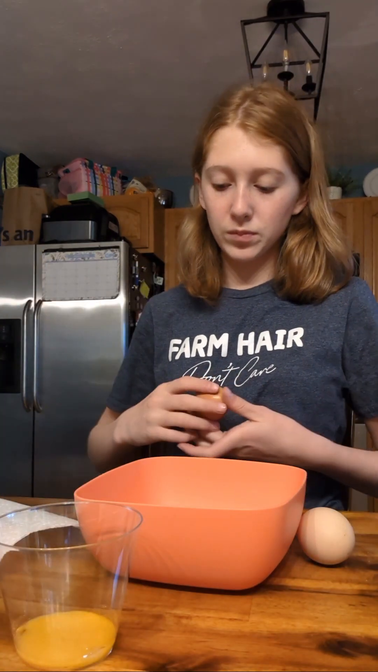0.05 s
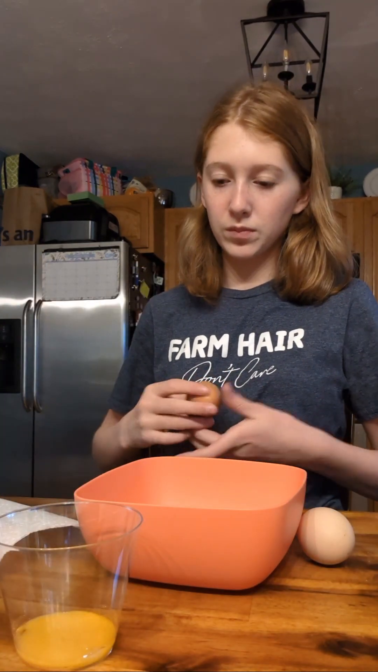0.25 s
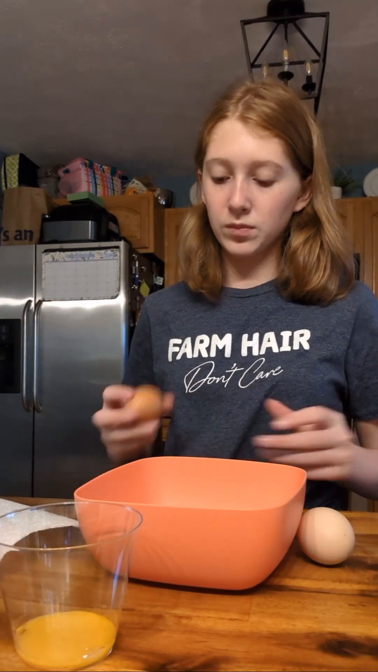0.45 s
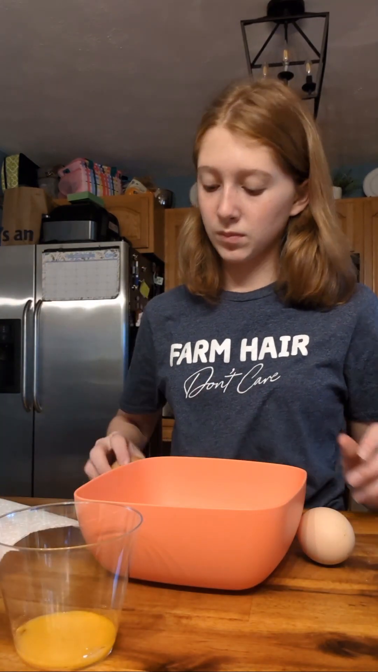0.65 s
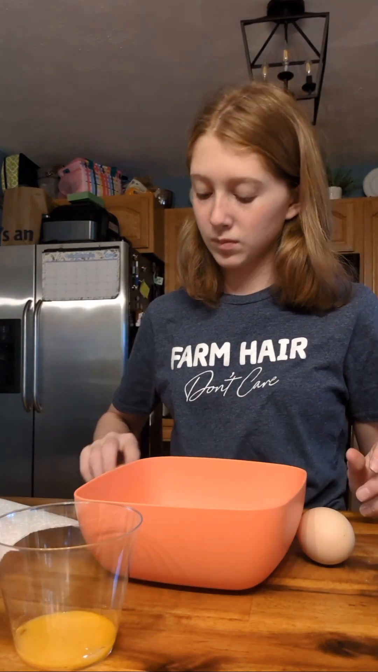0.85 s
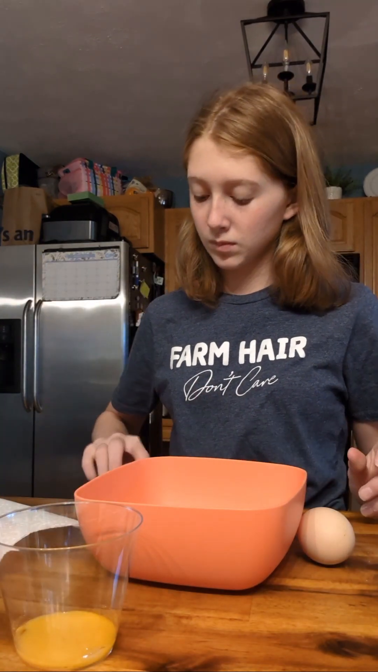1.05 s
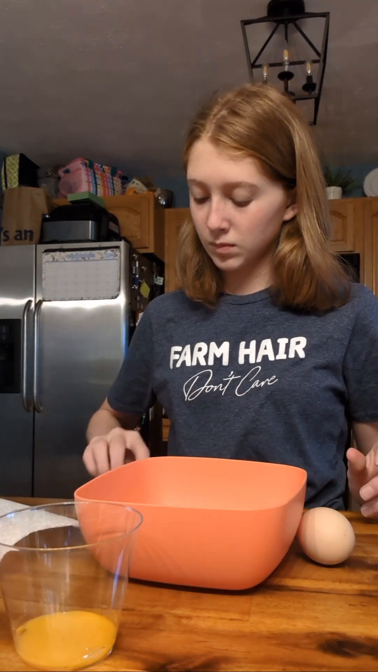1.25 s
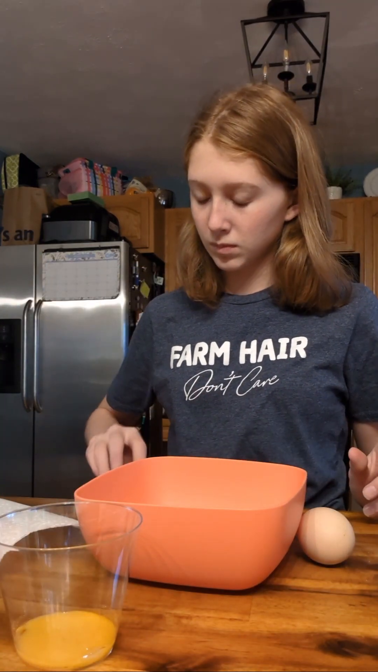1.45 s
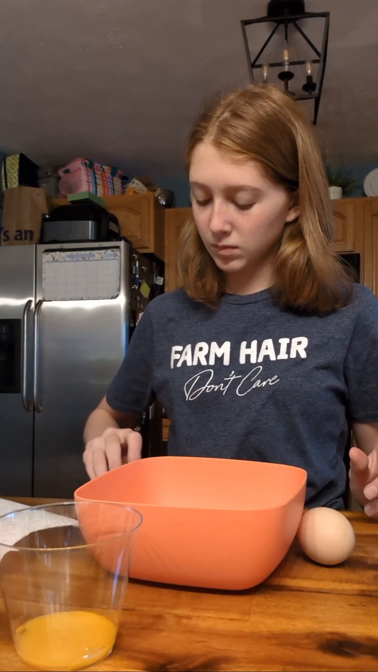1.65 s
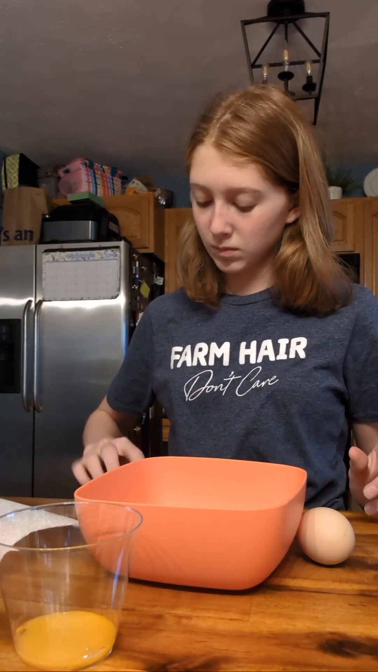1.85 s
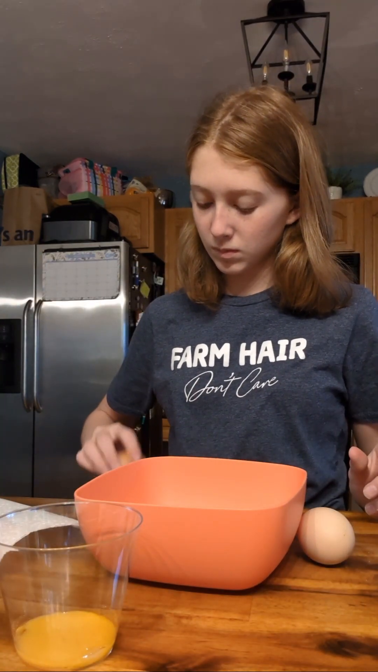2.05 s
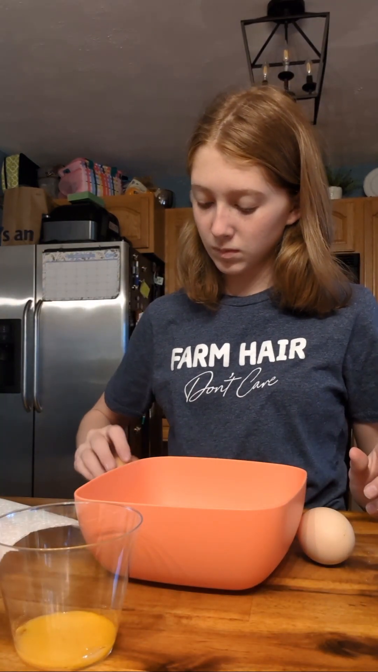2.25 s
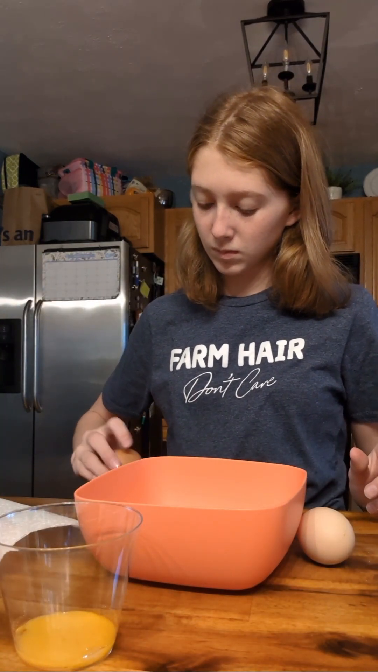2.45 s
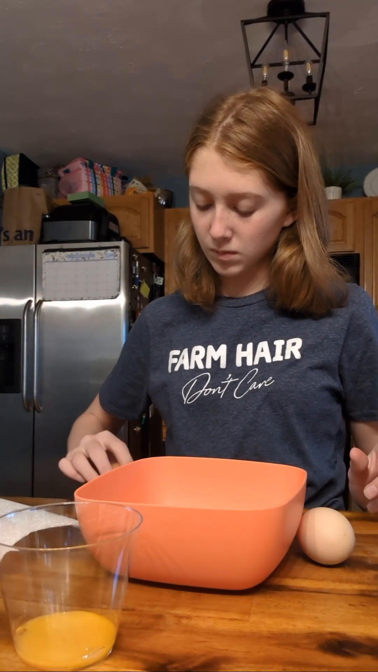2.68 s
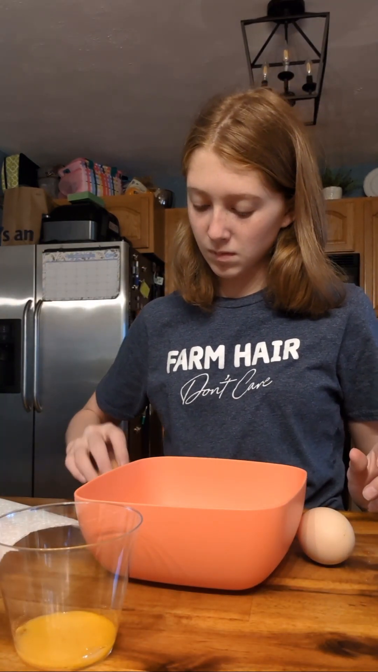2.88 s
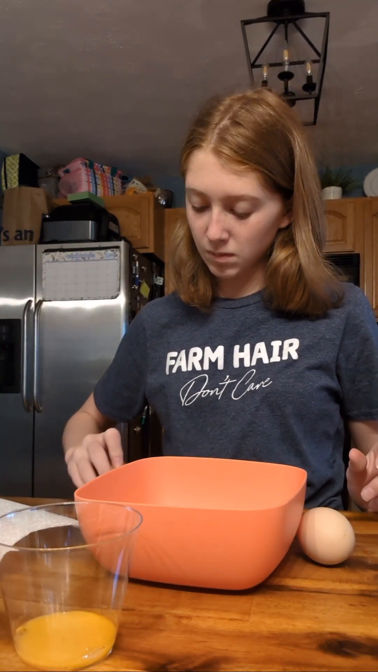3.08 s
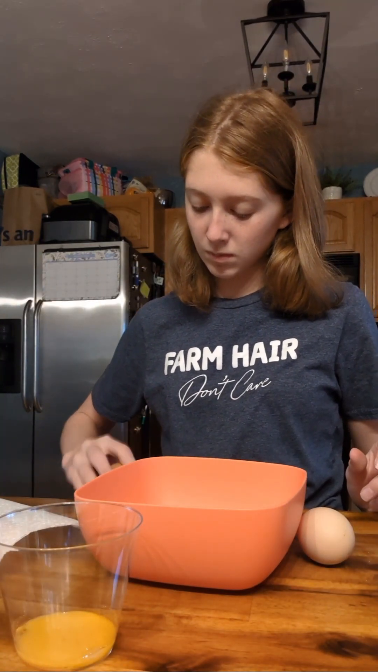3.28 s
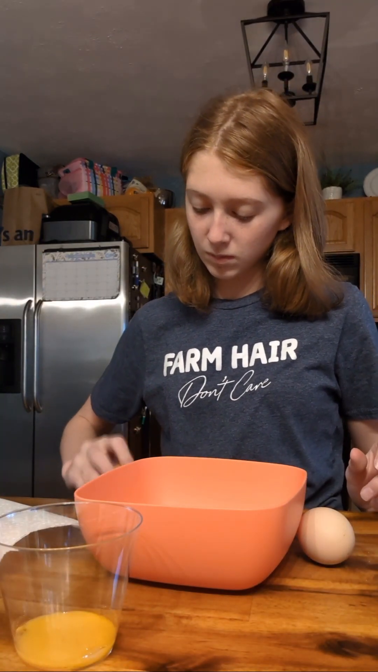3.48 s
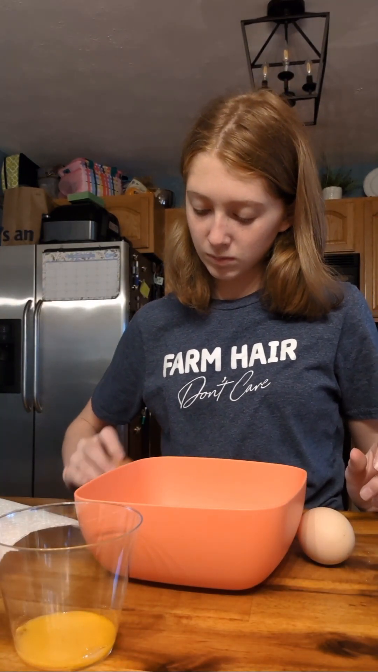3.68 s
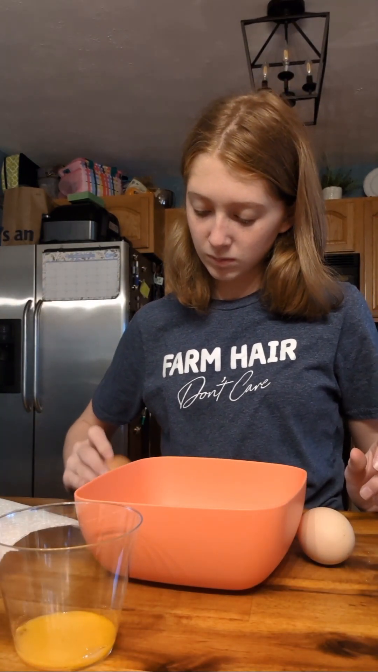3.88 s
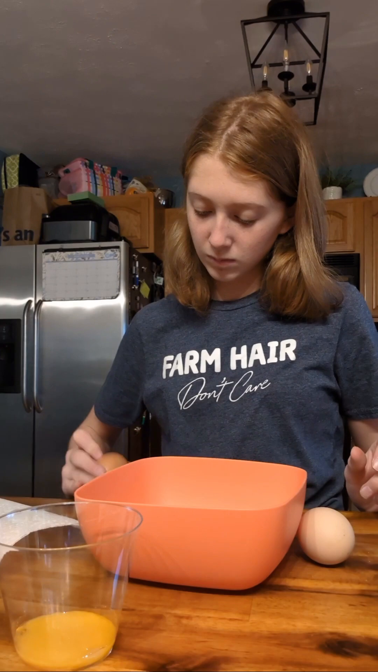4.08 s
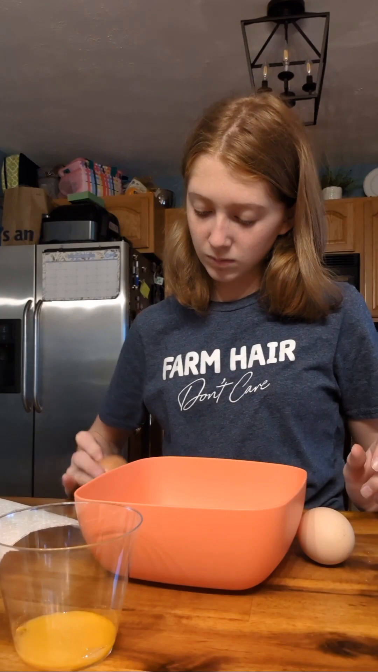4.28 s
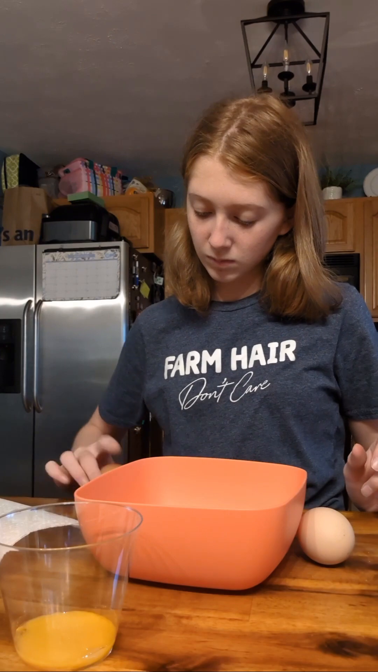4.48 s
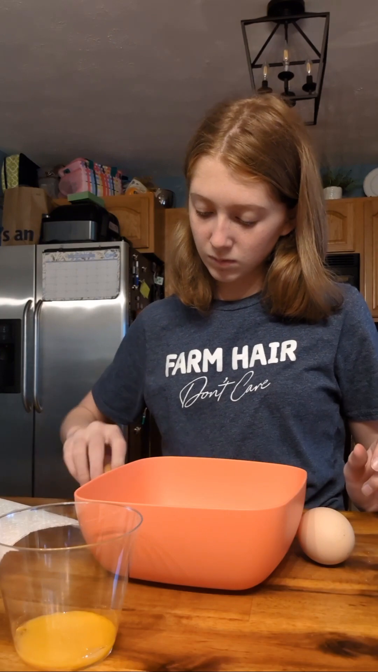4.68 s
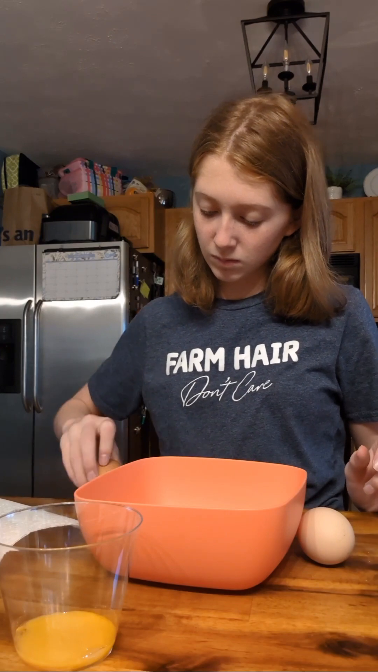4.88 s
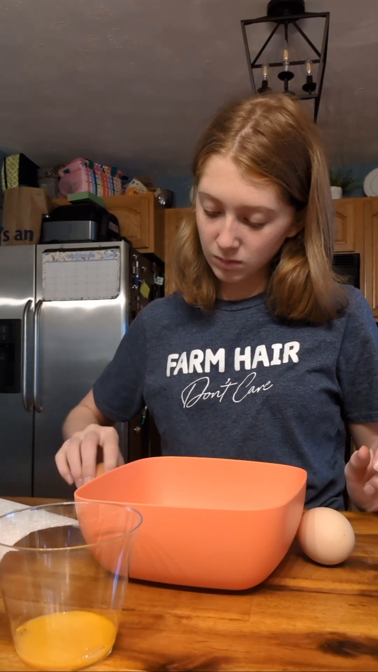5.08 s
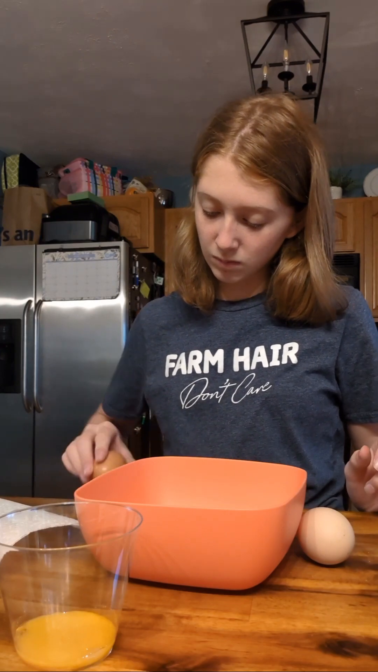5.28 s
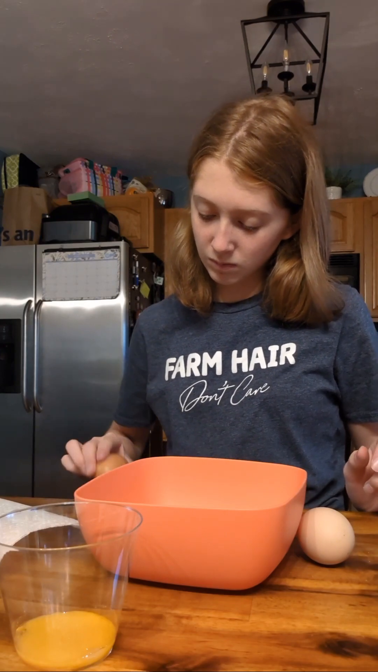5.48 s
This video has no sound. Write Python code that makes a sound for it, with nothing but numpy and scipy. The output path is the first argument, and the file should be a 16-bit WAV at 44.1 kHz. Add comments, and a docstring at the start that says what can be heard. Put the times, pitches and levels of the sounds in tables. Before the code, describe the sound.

A quiet kitchen: a low, slightly wavering fridge hum and soft, dull room air, a little hissier at the very start. At about 0.6 s a very faint squeak slides downward. From 0.85 s an egg is knocked on the rim of a plastic bowl, roughly every 0.2 s. The first five knocks, to 1.7 s, are hollow, with a woody thud from the table and a short room tail. From 1.9 s they are drier and lighter; the one at 2.77 s is very weak. After a short gap, knocks from 3.12 to 4.38 s are crisper, with brighter shell clicks. Then a pause: light touches and a brief faint rub around 4.6 s, small soft bumps, and a dull low bump with touches at 5.03 s. One last crisp knock lands at 5.43 s, its tail cut short. Close stereo pickup, taps leaning left, loud peaks squeezed.

```python
"""Egg knocked on a bowl rim

An egg is knocked again and again on the rim of a plastic bowl on a wooden kitchen table, left of a phone.
Each knock is shell noise plus dying sines: short ones for the bowl, longer for the table top; a noise tail
is the kitchen's answer. Hum lines (a fridge) and shaped noise (room air) lie behind; a faint squeak, light
touches, dull bumps and a short rub join in. The phone's limiter squeezes every knock."""
import sys
import numpy as np
from scipy import signal
from scipy.fft import rfft, irfft
from scipy.io import wavfile
from scipy.ndimage import uniform_filter1d

SR = 44100
rng = np.random.default_rng(int(sys.argv[2]) if len(sys.argv) > 2 else 0)


def attenuation_scalar(level_db):
    """Turn a level in dB into a linear amplitude multiplier (20 dB per decade)."""
    decades = np.asarray(level_db, float) / 20
    return 10 ** decades


def waveform_to_disk(signal):
    """Save audio, clipped to [-1, 1], as 16-bit WAV at the path in sys.argv[1]."""
    frames = np.transpose(np.atleast_2d(signal))
    scaled = np.clip(frames, -1, 1) * 32767
    samples = np.round(scaled).astype(np.int16)
    wavfile.write(sys.argv[1], SR, samples)


N = 243873

# Right port against left, direct sound. Each row: frequency in Hz, gain in dB.
PORT_SHADOW = [(150, -18.5), (600, -31), (1500, -40.5), (4000, -8.5), (8000, -24.5), (12000, 1)]
# Faint falling squeak. Each row: time in seconds, frequency in Hz, level in dB before fuzz and panning.
SQUEAK_PATH = [(.575, 4260, -71), (0.602, 4080, -62), (0.631, 3280, -65), (0.662, 2930, -68),
               (0.682, 2780, -72)]


def evened(x):
    """Scales to rms 1."""
    return x / np.sqrt(np.mean(x ** 2) + 1e-20)


def read(points, hz):
    """Reads a spectrum on a log-frequency axis."""
    f, value = np.transpose(points)
    return np.interp(np.log(hz + 1), np.log(f + 1), value)


def add(mix, start_s, sound):
    """Mixes a stereo sound in at start_s."""
    part = mix[:, round(start_s * SR):][:, :sound.shape[1]]
    part += sound[:, :part.shape[1]]


def air():
    """Room noise: random short-time spectra with soft patches, nearly mono in the bass."""
    # Noise spectrum. Each row: frequency in Hz, relative density in dB per Hz.
    air_tone = [(25, -34), (45, -12), (80, 0), (200, -2), (310, -12), (630, -17), (1000, -26), (2000, -31),
                (4000, -36), (6300, -40), (8000, -47), (13000, -51), (16000, -57)]
    # Swell of the middle band. Each row: time in seconds, boost in dB.
    swell_points = [(0, 11), (0.118, 10), (0.301, 1), (.45, 2), (4.501, 3), (4.8, 8), (5.1, 4.5),
                    (5.347, -1), (5.53, 7.5)]
    # Stereo likeness. Each row: frequency in Hz, left-right correlation.
    air_same = [(60, 0.93), (290, 0.97), (640, 0.14), (1400, 0.26), (3100, -0.32)]
    # Stereo balance. Each row: frequency in Hz, left over right in dB.
    air_lean = [(60, 0.54), (240, 0.49), (950, 4.7), (3770, 4.4), (15000, 1)]
    level_db, patches_db = -46, 1.8  # both rms
    frames, hz = N // 512 + 5, np.fft.rfftfreq(2048, 1 / SR)
    a, b, c, d, patches = rng.standard_normal((frames, 1025, 5)).T
    patches = evened(uniform_filter1d(uniform_filter1d(patches, 20, 0), 6, 1))
    same = np.clip(read(air_same, hz), -1, 1)[:, None]
    left = a + 1j * b
    right = same * left + np.sqrt(1 - same ** 2) * (c + 1j * d)
    z = np.array([left, right * attenuation_scalar(-read(air_lean, hz))[:, None]])
    # swell: full from 600 Hz to 7 kHz, none below 300 Hz or above 10.5 kHz
    band = np.clip(np.minimum(hz / 300 - 1, 3 - hz / 3500), 0, 1)[:, None]
    swell_db = np.interp(np.arange(frames) * 512 / SR, *np.transpose(swell_points)) * band
    z *= attenuation_scalar(read(air_tone, hz)[:, None] + patches_db * patches + swell_db)
    noise = signal.istft(z, nperseg=2048, noverlap=1536)[1][:, :N]
    return attenuation_scalar(level_db) * evened(noise)


def fridge():
    """Compressor hum: steady-pitched sines whose common level wavers, slightly to the left."""
    # Each row: frequency in Hz, rms in dB before wavering and panning.
    hum_lines = [(59.2, -38), (118.4, -52), (177.6, -55), (199.2, -58), (527.6, -69), (586.8, -69),
                 (764.4, -66)]
    # Each row: time in seconds, gain in dB.
    hum_waver = [(0, 0), (1.4, -.5), (1.7, -4), (2.7, -8), (3.1, -4), (4.0, -1), (4.75, -6), (5.0, -1),
                 (5.53, 0)]
    t = np.arange(N) / SR
    hum = sum(attenuation_scalar(db) * np.sqrt(2) * np.sin(2 * np.pi * (hz * t + rng.random())) for hz, db in hum_lines)
    return hum * attenuation_scalar(np.interp(t, *np.transpose(hum_waver))) * attenuation_scalar(np.array([[.4], [-.4]]))


def squeak():
    """Gliding sine, its amplitude roughened by smoothed noise."""
    s, hz, db = np.transpose(SQUEAK_PATH)
    t = np.arange(s[0], s[-1], 1 / SR)
    fuzz = 1 + .6 * evened(uniform_filter1d(rng.standard_normal(len(t)), 150))
    tone = np.sin(2 * np.pi * np.cumsum(np.interp(t, s, hz)) / SR)
    return attenuation_scalar(np.interp(t, s, db)) * fuzz * tone * attenuation_scalar(np.array([[3], [-6]]))


def crack(t60_s=0.01, rise_s=0.0016):
    """A few milliseconds of noise as the shell meets the rim."""
    # Shell noise. Each row: frequency in Hz, relative level in dB.
    shell_tone = [(1500, 3.5), (2500, 8), (3500, -1), (5500, -4), (7500, -10.5), (9000, -19.5),
                  (15000, -36.5)]
    t, hz = np.arange(1024) / SR, np.fft.rfftfreq(1024, 1 / SR)
    noise = rfft(rng.standard_normal(1024)) * attenuation_scalar(read(shell_tone, hz))
    both = irfft(noise * attenuation_scalar(np.array([0 * hz, read(PORT_SHADOW, hz)])))
    envelope = attenuation_scalar(-60 * t / t60_s) * (1 - np.exp(-(t / rise_s) ** 2))
    return both / np.std(both[0]) * envelope


def ring(modes, colour, chance, length_s, detune, scatter_db, rise_s):
    """Dying sines, each a little different from blow to blow; rows are modes."""
    hz, db, t60_s = np.transpose(modes)[..., None]
    t = np.arange(round(length_s * SR)) / SR
    level_db = db + read(colour, hz) + scatter_db * chance[:, :1] - 60 * t / t60_s
    phase = 2 * np.pi * hz * (1 + detune * chance[:, 1:2]) * t + chance[:, 2:]
    return attenuation_scalar(level_db) * (1 - np.exp(-t / rise_s)) * np.sin(phase)


def kitchen(colour):
    """Dense noise tail, every band dying at its own speed, drawn afresh for each blow."""
    # Decay. Each row: frequency in Hz, t60 in seconds.
    room_t60 = [(100, 0.66), (260, 0.33), (700, 0.39), (1840, 0.45), (4850, 0.4), (12800, 0.22)]
    # What the knocks send into the room. Each row: frequency in Hz, relative level in dB.
    room_tone = [(60, -16), (120, 13.5), (300, 28), (600, 27), (1100, 7), (2000, -6), (2800, -9),
                 (3500, -14.5), (4500, -12), (7000, -15.5), (9000, -21.5), (15000, -34)]
    # Stereo likeness. Each row: frequency in Hz, left-right correlation.
    tail_same = [(100, 0.87), (300, 1), (700, 0.18), (2000, 0.027)]
    # Stereo balance. Each row: frequency in Hz, left over right in dB.
    tail_lean = [(150, 0.5), (500, 5), (2000, 2), (5000, 7), (9000, 4.5), (13000, -5.5)]
    build_s, ripple_db = .012, 2.2  # reflections take time to fill the room, unevenly over frequency
    taps = rng.standard_normal((2, SR // 2))
    hz, t, z = signal.stft(taps, SR, nperseg=512)
    same = np.clip(read(tail_same, hz), 0, 1)[:, None]
    right = same * z[0] + np.sqrt(1 - same ** 2) * z[1]
    z[1] = right * attenuation_scalar(-read(tail_lean, hz))[:, None]
    uneven_db = ripple_db * evened(uniform_filter1d(rng.standard_normal(len(hz)), size=2))
    start_db = read(room_tone, hz) + read(colour, hz) + uneven_db
    level_db = start_db[:, None] - 60 * t / read(room_t60, hz)[:, None]
    tail = signal.istft(z * attenuation_scalar(level_db), SR, nperseg=512)[1]
    return tail * (1 - np.exp(-np.arange(tail.shape[1]) / SR / build_s))


def knock(blow_db, thud_db, cavity_db, crack_db, room_db, bright_db):
    """Where the egg lands decides how much low, middle and high modes are driven."""
    # Short rings of bowl and shell. Each row: nominal Hz, relative level in dB, t60 in seconds.
    bowl_modes = [(241, -2.5, 0.3), (371, 8, 0.11), (605, 13, 0.069), (718, -4, 0.13), (1008, -2, 0.045),
                  (1109, 6, 0.014), (1532, -12, 0.038), (2000, -6, 0.031), (2450, -7.5, 0.008),
                  (3314, -2, 0.012)]
    # Longer rings of table top and the air above. Each row: nominal Hz, relative level in dB, t60 in seconds.
    table_modes = [(98.8, -4.5, 0.19), (136.3, -16, 0.45), (199.9, 3, 0.13), (247.4, -1, 0.2),
                   (307.5, -8, 0.32), (406, -13, .45), (384.7, -15, 0.84), (450, -26, 0.12),
                   (531.8, 1.5, 0.2), (608, -23.5, 1), (709, -29, 0.87), (750, -11.5, 0.61),
                   (871, -9, 0.25), (1020, -18, 0.3), (1090, -40.5, 0.17), (1574, -19, 0.087),
                   (1970, -40, 0.55), (2065, -38, 0.45), (2476, -35.5, 0.34), (3020, -52, 0.11)]
    colour = [(300, thud_db), (600, cavity_db), (1100, 0.035), (2500, crack_db)]
    chance = rng.standard_normal((len(bowl_modes), 3)) * [1, 1, .3]
    modes = ring(bowl_modes, colour, chance, .08, detune=.015, scatter_db=1.2, rise_s=.0015)
    shadow = attenuation_scalar(read(PORT_SHADOW, np.transpose(bowl_modes)[0]))[:, None]
    direct = np.array([modes.sum(0), (modes * shadow).sum(0)])
    add(direct, 0, attenuation_scalar(crack_db + 2.0) * crack())
    direct[1] = np.roll(direct[1], 20)  # right port hears it 20 samples later

    spread = [(150, 0.47 * thud_db - 0.39 * cavity_db - 13.0),
              (350, thud_db),
              (700, cavity_db + 0.61 * room_db),
              (1200, room_db),
              (2000, room_db + 0.73 * bright_db),
              (3200, room_db + bright_db),
              (4500, 0.65 * room_db + 1.09 * crack_db + 0.082 * bright_db)]
    out = attenuation_scalar(-4.0) * kitchen(spread)
    wood = []
    for _ in range(2):
        chance = rng.standard_normal((len(table_modes), 3)) * [1, 1, 3]
        rings = ring(table_modes, spread, chance, .5, detune=.004, scatter_db=2.2, rise_s=.015)
        wood.append(rings.sum(0))
    wood_right = attenuation_scalar(-3.5) * (0.68 * wood[0] + 0.61 * wood[1])
    add(out, 0, attenuation_scalar(3.5) * np.array([wood[0], wood_right]))
    add(out, 0, direct)
    return attenuation_scalar(blow_db + 7.0) * out


def bump(db, hz):
    """A dull push: one low ring that dies fast."""
    t60_s, rise_s = 0.058, 0.00105
    t = np.arange(SR // 8) / SR
    envelope = attenuation_scalar(db - 60 * t / t60_s) * (1 - np.exp(-t / rise_s))
    return envelope * np.sin(2 * np.pi * hz * t) * attenuation_scalar(np.array([[1.5], [-1.5]]))


def rub():
    """Shell rubs along the rim: dense tiny slips, swelling then fading, each shell noise and a short rim ring."""
    length_s, slips_per_s = .095, 600
    rim_hz, rim_t60_s, level_db = 1150, .012, -48  # level is rms
    u = np.arange(0, length_s, 1 / SR) / length_s
    slips = rng.standard_normal(SR // 4) * (rng.random(SR // 4) < slips_per_s / SR)
    slips = slips[:len(u)] * np.sin(np.pi * u ** 1.2)
    t = np.arange(1024) / SR
    rim = attenuation_scalar(-60 * t / rim_t60_s) * np.sin(2 * np.pi * rim_hz * t) * attenuation_scalar(np.array([[0], [-7]]))
    grain = 2.1 * crack() + rim
    return attenuation_scalar(level_db) * evened(signal.fftconvolve(slips[None], grain, axes=1))


def scene():
    """Knocks, touches, bumps, a squeak and a rub over the hum and air of the kitchen."""
    # Knocks on the rim. Each row: start in seconds, then relative dB of blow, table thud,
    # cavity near 600 Hz, room.
    knock_rows = [(0.846, 2.5, -16.5, -14, -6.5), (1.077, -2, -9.5, -11.5, -1.5),
                  (1.282, -3, -5, -11.5, 4.5), (1.485, -3, -13.5, -12.5, -1), (1.681, -8, -9.5, -8, 0.5),
                  (1.895, -1.5, -29, -21.5, -2), (2.162, -3, -31.5, -25, -7),
                  (2.3535, -2.5, -33, -27.5, -8), (2.585, 0, -29.5, -24, -16.5),
                  (2.768, -16, -24, -27, -18), (3.122, -2.5, -29.5, -16.5, 0),
                  (3.348, -2, -26, -19.5, -13.5), (3.553, -4.5, -24.5, -16.5, -8),
                  (3.772, -3, -25, -20, -10.5), (3.976, -4.5, -22.5, -12, -12),
                  (4.186, -5, -24.5, -15, -15), (4.381, -5, -29.5, -6.5, -15.5),
                  (5.431, -6, -22, -13.5, -10)]
    # Knocks turn crisper as they go on. Each row: time in seconds, shell crack in relative dB.
    crisp_points = [(0.85, -16.5), (1.28, -9.5), (1.7, -9.5), (2.35, -6.5), (2.77, -11.5), (3.12, -4),
                    (3.77, 0), (4.2, -3.5), (4.4, 1), (5.43, -4.5)]
    # Light touches of egg on rim. Each row: start in seconds, blow and shell crack in relative dB.
    touch_rows = [(3.03, -57, 9), (4.603, -34, -3), (4.795, -45, 1.5), (5.024, -27.5, -11), (5.092, -45, 4),
                  (5.134, -40, -3)]
    # Soft low bumps on the table. Each row: start in seconds, level in dB before rise and panning, Hz.
    bump_rows = [(4.61, -31, 142), (4.72, -24, 242), (5.027, -15.5, 265), (5.041, -14.5, 160)]
    mix = air() + fridge()
    add(mix, SQUEAK_PATH[0][0], squeak())
    for s, blow_db, thud_db, cavity_db, room_db in knock_rows:
        crack_db = np.interp(s, *np.transpose(crisp_points))
        # crisp knocks leave a bright tail, heavy and hollow ones a dull tail
        bright_db = -8 + 0.52 * crack_db - 0.31 * thud_db - 0.17 * cavity_db - 0.41 * room_db
        add(mix, s, knock(blow_db, thud_db, cavity_db, crack_db, room_db, bright_db))
    for s, blow_db, crack_db in touch_rows:
        touch = knock(blow_db, thud_db=-13, cavity_db=-8.5, crack_db=crack_db, room_db=-8, bright_db=5.5)
        add(mix, s, touch)
    for s, db, hz in bump_rows:
        add(mix, s, bump(db, hz))
    add(mix, 4.63, rub())
    return mix


def top_cut(x):
    """Nothing passes above the cut-off."""
    return signal.sosfilt(signal.butter(12, 16370, fs=SR, output="sos"), x)


def record(dry):
    """Limiter reacts just after each knock starts, ducks everything and lets go quickly; peaks clip."""
    knee_db, attack_s, fall_db_per_s = -17.0, 0.0013, 94.0  # fall: of the held level
    power = signal.oaconvolve((dry ** 2).mean(0), np.ones(128) / 128)[:N]
    power_db = 10 * np.log10(power.clip(0) + 1e-12)
    fall_db = np.arange(N) * fall_db_per_s / SR
    held_db = np.maximum.accumulate(power_db + fall_db) - fall_db
    over_db = np.maximum(held_db - knee_db, 0)
    lag = np.exp(-1 / (attack_s * SR))
    ducked = dry / attenuation_scalar(.5 * signal.lfilter([1 - lag], [1, -lag], over_db))  # 2:1 above the knee
    # small microphone ports lose the deep bass
    ducked = signal.sosfilt(signal.butter(2, 40., "high", fs=SR, output="sos"), ducked)
    finished = np.clip(ducked, -1, 1)
    return top_cut(finished)


dry = scene()
out = record(dry)
waveform_to_disk(out)
```